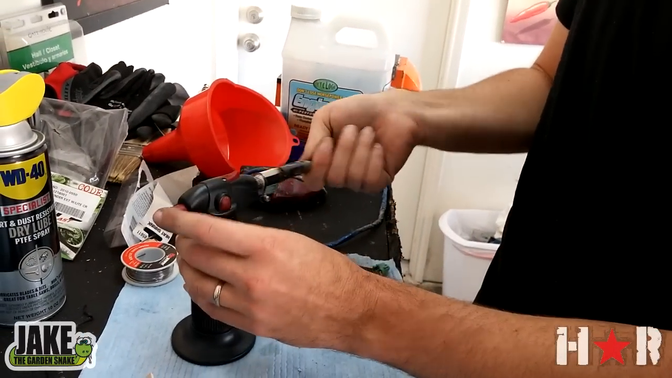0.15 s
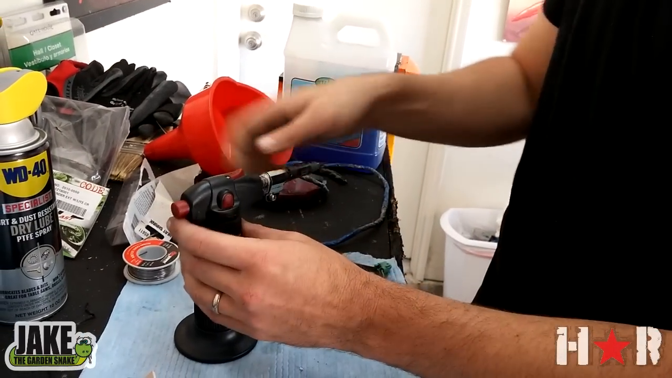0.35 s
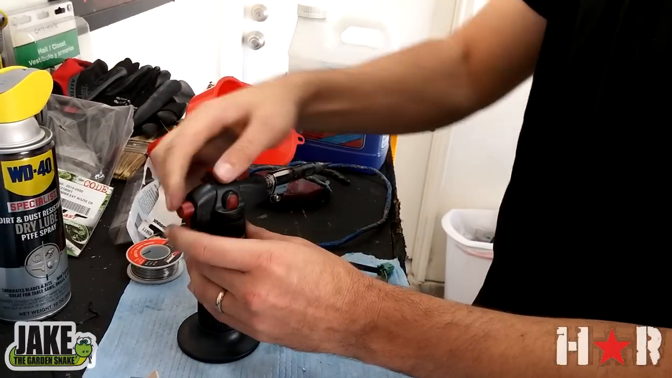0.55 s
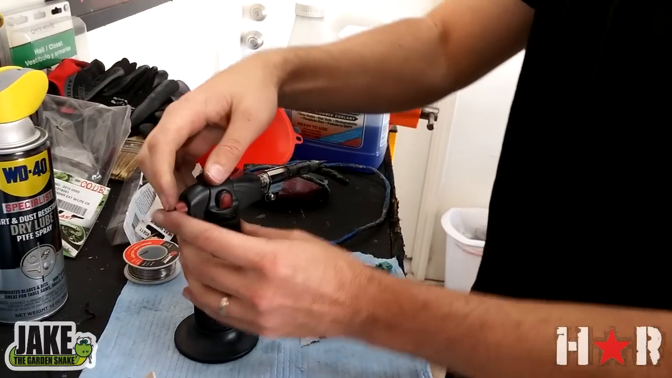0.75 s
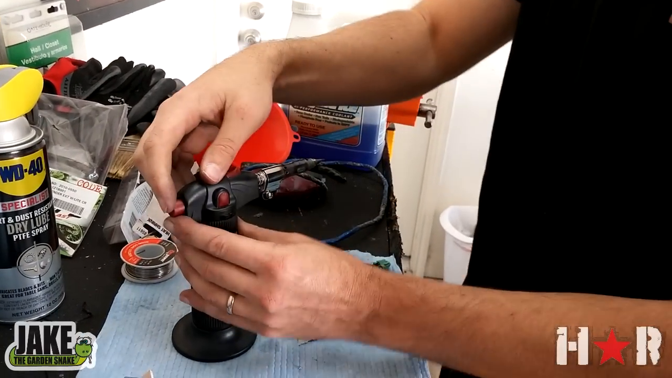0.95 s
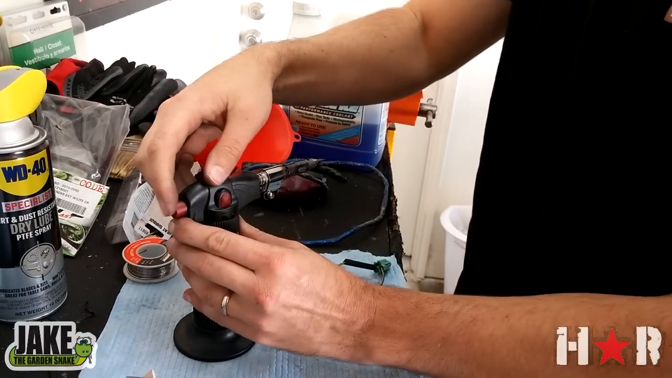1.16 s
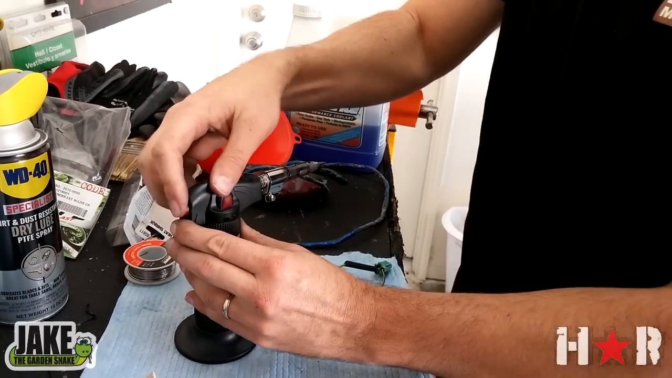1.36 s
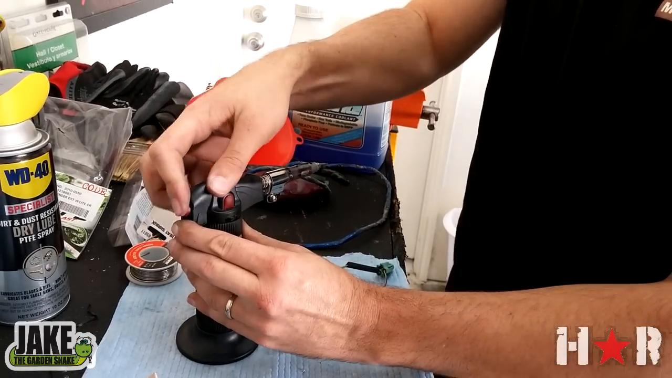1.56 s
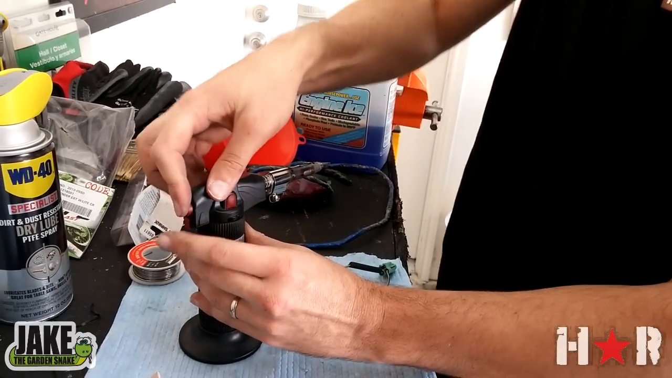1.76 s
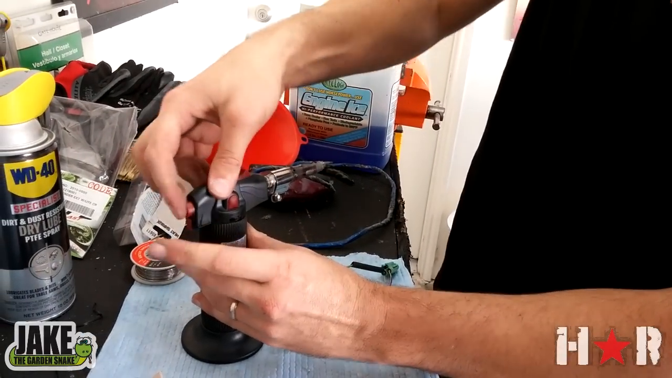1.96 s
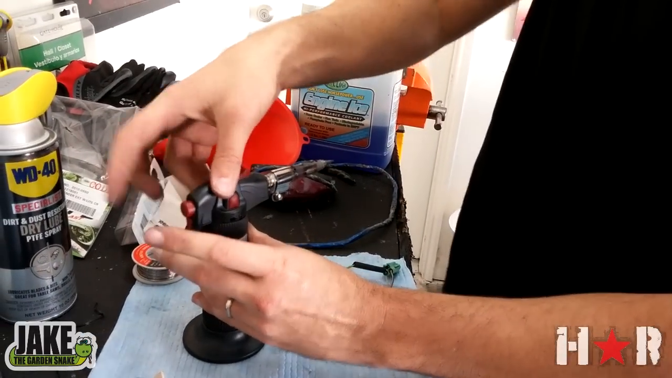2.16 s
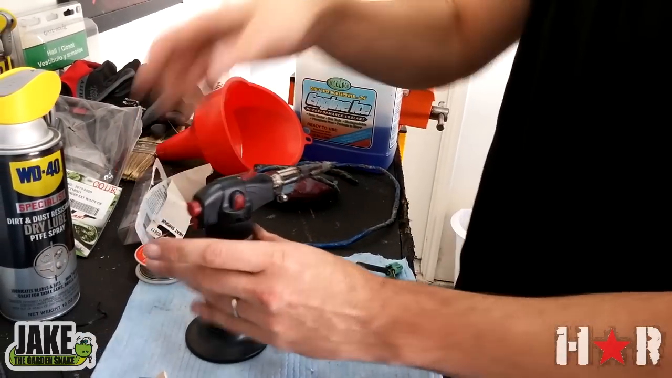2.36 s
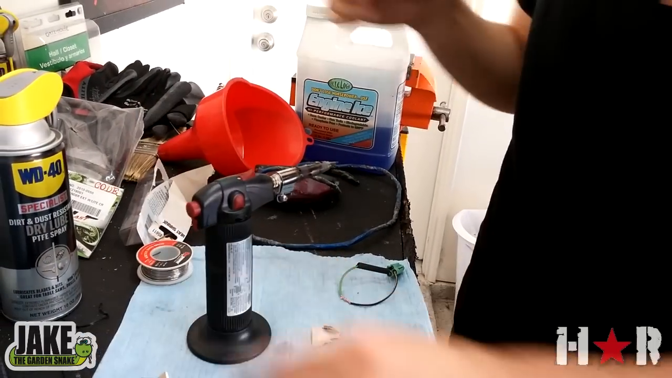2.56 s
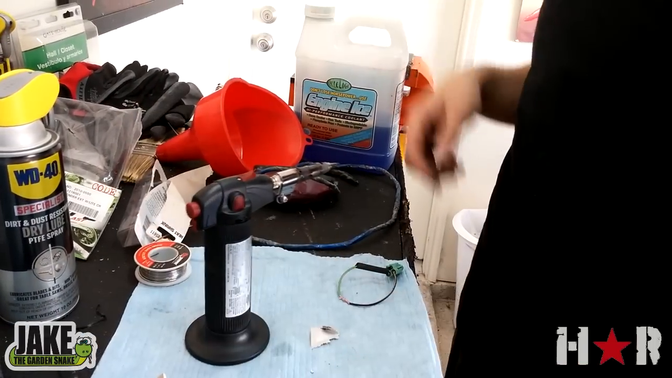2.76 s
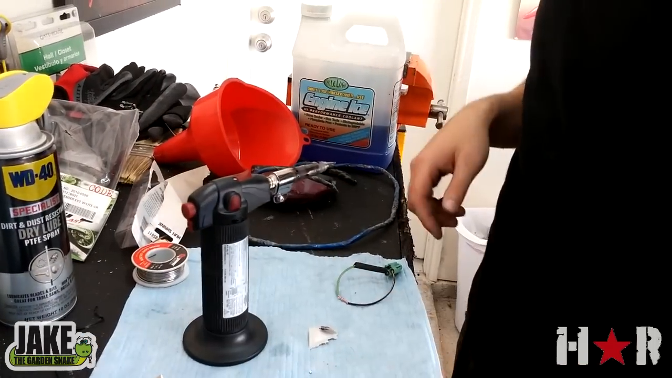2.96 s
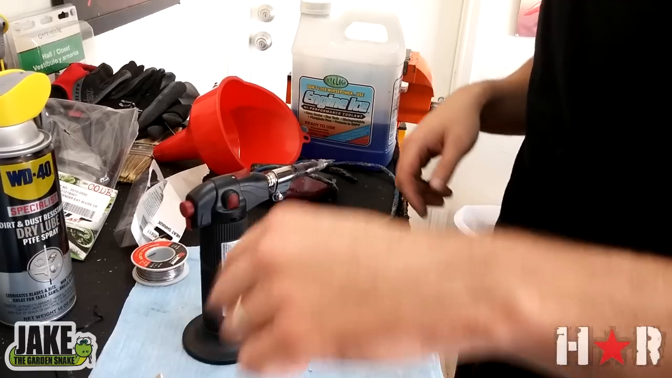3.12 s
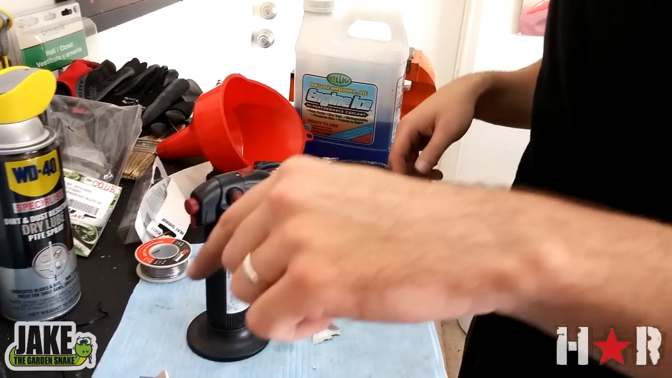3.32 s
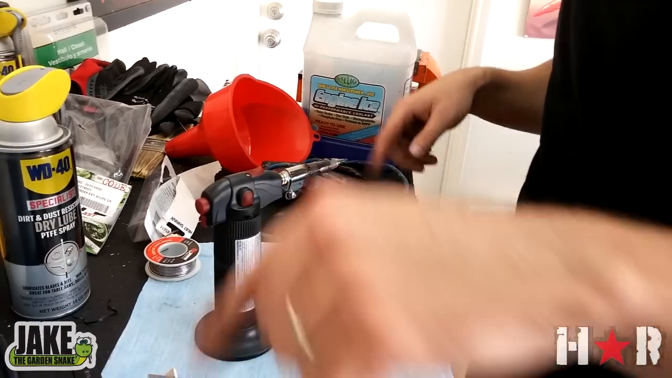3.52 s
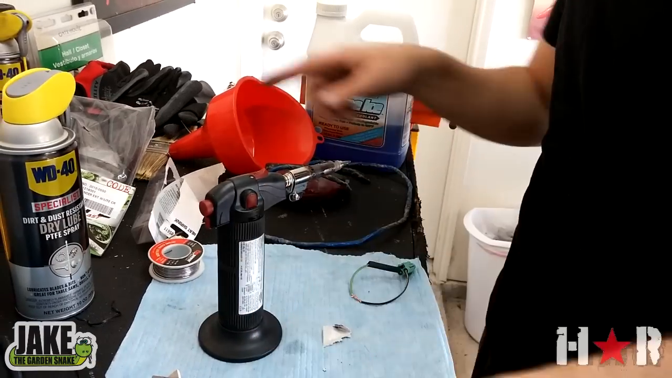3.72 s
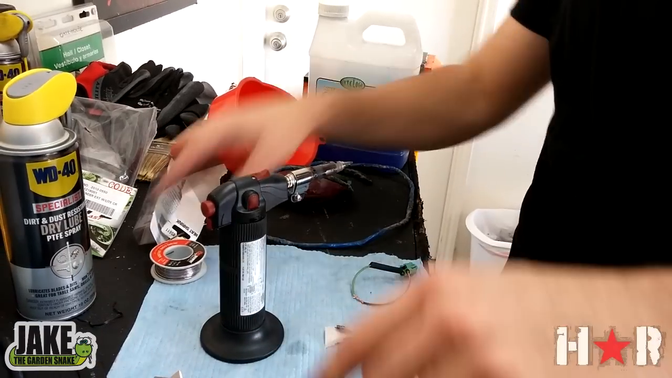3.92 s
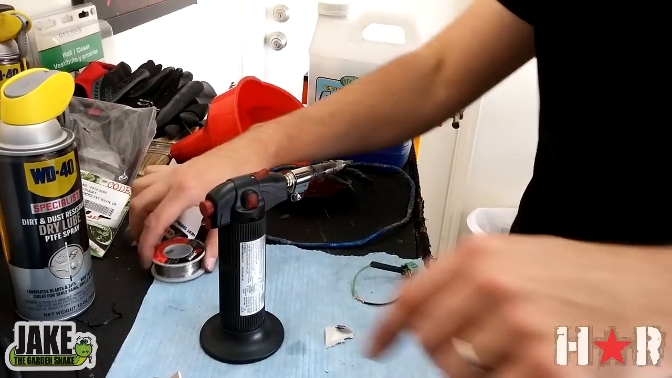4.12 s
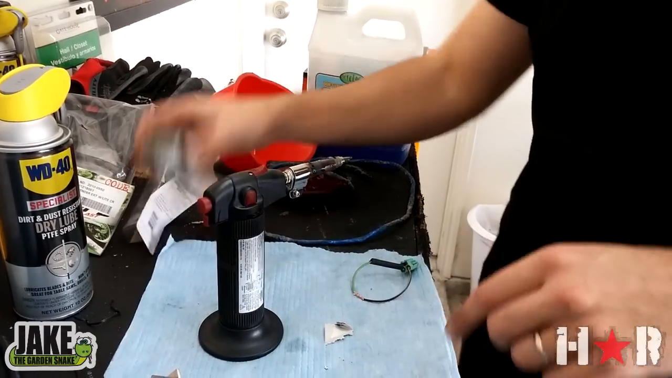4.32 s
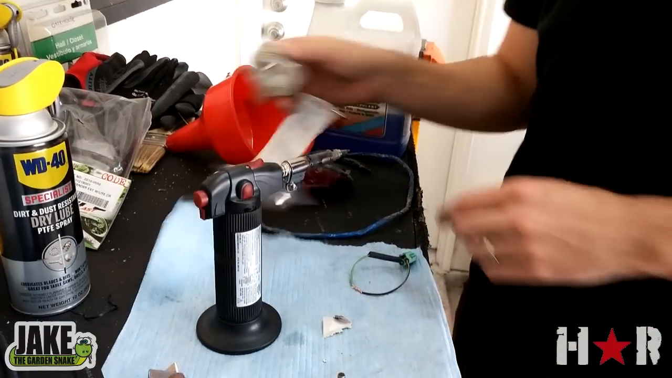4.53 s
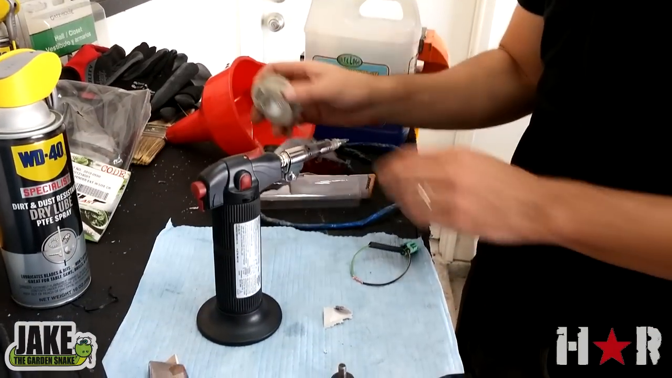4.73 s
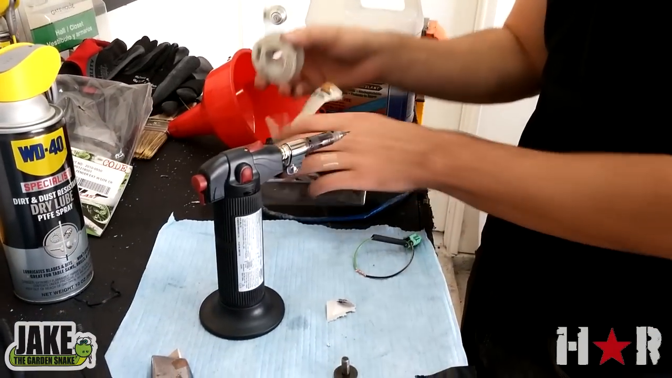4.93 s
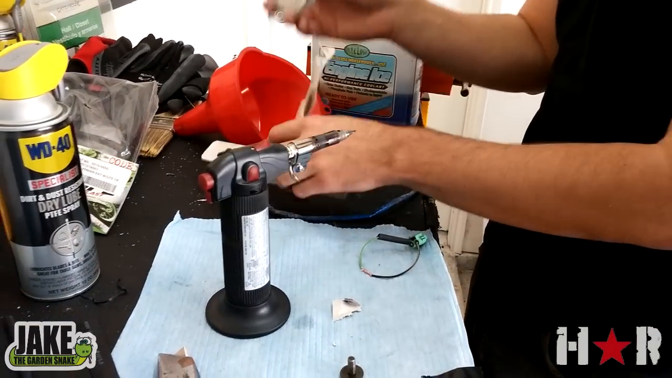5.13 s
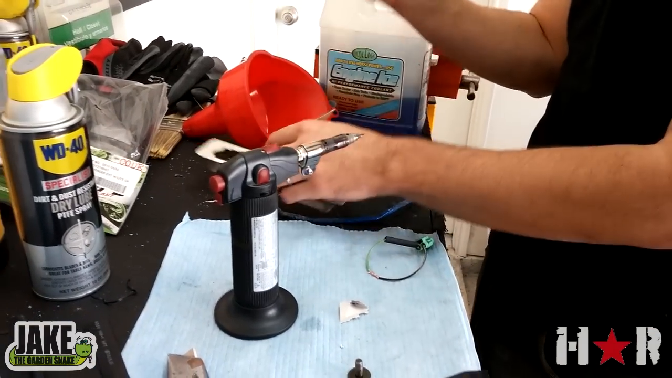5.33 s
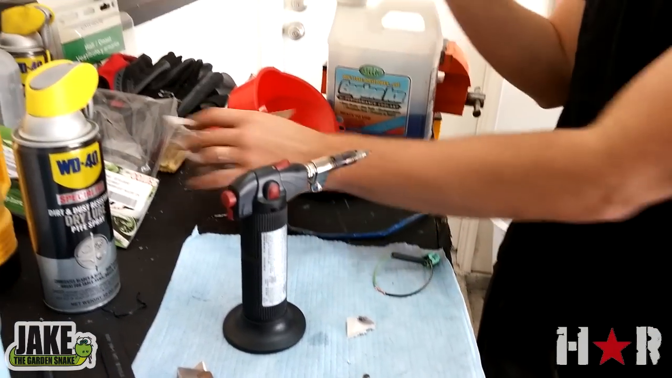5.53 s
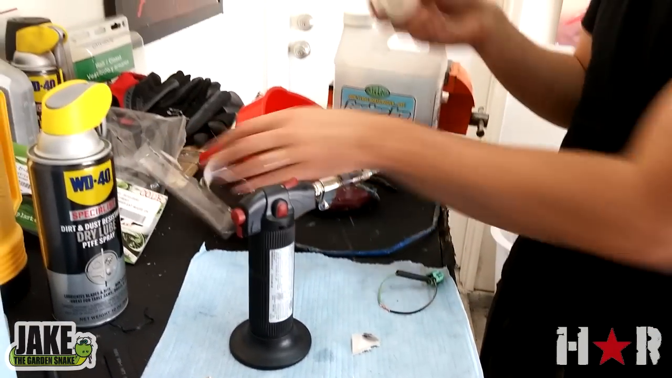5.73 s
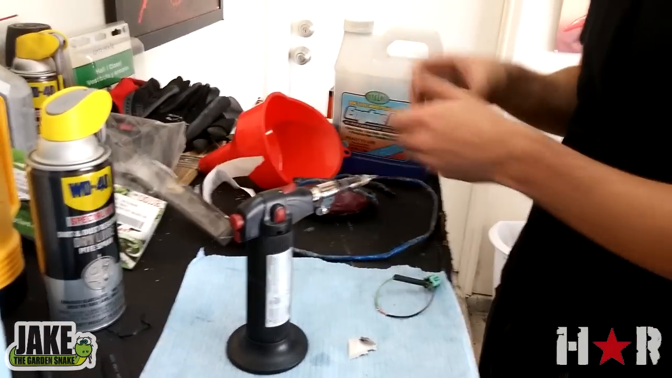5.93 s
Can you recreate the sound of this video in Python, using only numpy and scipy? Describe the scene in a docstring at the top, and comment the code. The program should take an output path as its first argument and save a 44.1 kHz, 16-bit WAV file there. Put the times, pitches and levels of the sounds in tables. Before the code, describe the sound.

A small butane torch lights with a sharp snap and hisses steadily, while a plastic box is picked up, knocked and set down.

```python
"""A butane torch on a workbench in a small room. Over a faint mains hum, fingers brush and handle the
torch with small clicks. The hum grows, cold gas leaks, and at 1.27 s the piezo lighter snaps and the gas
lights with a thump. The jet then hisses through the burner's resonances (the pitches it rings at) over
a soft flame roar, and a hollow note swells once. From 3.8 s a plastic box is picked up, rattled and put
down beside the torch, which burns on to the end."""
import sys
import numpy as np
from scipy import signal
from scipy.fft import rfft, irfft, next_fast_len
from scipy.io import wavfile
from scipy.ndimage import uniform_filter1d

SR = 44100
rng = np.random.default_rng(int(sys.argv[2]) if len(sys.argv) > 2 else 0)


def persist_wave(psi):
    """Save psi, clipped to +-1, as 16-bit WAV."""
    counts = np.round(np.clip(psi, -1, 1) * 32767).astype(np.int16)
    wavfile.write(sys.argv[1], SR, np.atleast_2d(counts).T)


N = 268172
TIME = np.arange(N) / SR
RING = TIME[:SR // 2]  # half a second of time, for short sounds


def undb(db):
    """Turn decibels into a number to multiply by."""
    return 10 ** (np.asarray(db) / 20)


def unit(x):
    """Scale a signal to an average strength (rms) of one."""
    return x / np.sqrt(np.mean(x ** 2))


def pan(db):
    """Left and right gains. A pan is the left level minus the right level, in dB."""
    return undb(np.array([[1], [-1]]) * db / 2)


def wander(rate):
    """A smooth random drift of about size one, with `rate` new values a second."""
    hold = int(SR / rate)
    steps = np.repeat(rng.standard_normal(N // hold + 1), hold)
    return unit(uniform_filter1d(uniform_filter1d(steps, hold), hold)[:N])


def ramp(middle_s, seconds):
    """An even change from 0 to 1."""
    return np.clip((TIME - middle_s) / seconds + .5, 0, 1)


def fade(t60):
    """Die away by 60 dB in t60 seconds, the ring time."""
    return np.exp(-np.log(1000) * RING / t60)


def envelope(s, length, attack, release):
    """Rise at time s, hold until the length is up, then die away."""
    return np.clip((TIME - s) / attack, 0, 1) * np.exp(-np.maximum(TIME - s - length, 0) / release)


def rubbing(rows, attack, release):
    """The strength of a series of rubs that all rise and fall the same way."""
    return sum(undb(db) * envelope(s, length, attack, release) for s, length, db in rows)


def colour(x, points, size=4096):
    """Shape the tone along a curve of (pitch [Hz], level [dB]) points."""
    hz, db = np.transpose(points)
    gain_db = np.interp(np.log(np.fft.rfftfreq(size, 1 / SR) + 1), np.log(hz), db)
    cepstrum = irfft(np.log(undb(gain_db)))
    cepstrum[1:size // 2] *= 2  # folded so that nothing rings before the sound starts
    cepstrum[size // 2 + 1:] = 0
    response = irfft(np.exp(rfft(cepstrum)))
    return signal.fftconvolve(np.atleast_2d(x), response[None], axes=1)[:, :x.shape[-1]]


def lowpass(x, hz, order=2):
    """Cut the treble above hz."""
    return signal.sosfilt(signal.butter(order, min(hz, SR / 2 - 1000), fs=SR, output="sos"), x)


def highpass(x, hz):
    """Gently cut the bass below hz."""
    return signal.sosfilt(signal.butter(1, min(hz, SR / 4), "high", fs=SR, output="sos"), x)


def aside(x, db, shadow_hz=700):
    """Move a sound to one side: only the treble is shadowed, the bass reaches both sides alike."""
    bass = lowpass(x, shadow_hz, order=1)
    return bass + (x - bass) * pan(db)


def diffuse(count, split_hz=1300):
    """Noise from all around: left and right are alike in the bass, unrelated in the treble."""
    mid, side = rfft(rng.standard_normal((2, count)))
    likeness = np.exp(-(np.fft.rfftfreq(count, 1 / SR) / split_hz) ** 2)
    spectrum = mid * np.sqrt(1 + likeness) + np.array([[1], [-1]]) * side * np.sqrt(1 - likeness)
    return irfft(spectrum, count) / np.sqrt(2)


def room(x, wet_db, t60=0.47, treble_t60=0.34):
    """Add the echoes of a small cluttered room, whose treble dies first."""
    noise = diffuse(len(RING))
    low = lowpass(noise, 3500)
    onset = np.clip(RING / 0.0019 - 1, 0, 1)
    tail = (low * fade(t60) + (noise - low) * fade(treble_t60)) * onset
    return x + undb(wet_db) * signal.fftconvolve(x, unit(tail) / np.sqrt(len(RING)), axes=1)[:, :N]


def add(out, s, db, sound, size=176):
    """Mix in a short sound at time s, with its loudest 4 ms at level db."""
    start = max(int(s * SR), 0)
    peak = np.sqrt(uniform_filter1d(np.mean(sound ** 2, axis=0), size).max())
    out[:, start:start + len(RING)] += (sound * undb(db) / peak)[:, :N - start]


def contact(seconds, spread):
    """A burst of tiny impacts as two hard parts meet; nearby things scatter it left and right."""
    burst = rng.standard_normal(len(RING)) + spread * diffuse(len(RING))
    return burst * np.exp(-RING / seconds) * (1 - np.exp(-RING / 0.00068))


def resonance(hz, width, db=0, pan_db=0, lead=0, likeness=0.77, waver_db=1.45):
    """Noise ringing around one pitch and wavering; the right side's wave is `lead` radians ahead."""
    size = next_fast_len(N)
    freqs = np.fft.rfftfreq(size, 1 / SR)
    direct, *scattered = rfft(rng.standard_normal((3, size)))
    phase = np.exp(np.array([[-.5j], [.5j]]) * lead)
    sides = np.sqrt(likeness) * direct * phase + np.sqrt(1 - likeness) * np.array(scattered)
    band = irfft(sides / (1 + ((freqs - hz) / (0.89 * width)) ** 2), size)[:, :N]
    waver = waver_db * np.array([wander(3.11), wander(3.36)])
    return band * undb(db + waver) * pan(pan_db)


# tone of the room's rumble (pitch [Hz], level [dB])
RUMBLE_TONE = [(20, -41), (38, -33), (60, 12.5), (78, 5), (100, 0), (170, -1.5), (260, -6.5), (600, -10),
               (1200, -19.5), (4000, -29)]
def background(quiet_db=-70, rise_db=18, sag_db_per_s=.5):
    """An appliance hums at twice the mains frequency over a rumble; both swell as the torch lights."""
    hum = np.sqrt(2) * np.sin(2 * np.pi * 119.9 * TIME) * undb(.7 * wander(8))
    rumble = unit(colour(diffuse(N), RUMBLE_TONE))
    db = quiet_db + rise_db * ramp(middle_s=1.057, seconds=0.58) - sag_db_per_s * TIME
    return (hum + rumble) * undb(db) * pan(2.3)


# tone of skin brushing the torch (pitch [Hz], level [dB])
BRUSH_TONE = [(300, -2), (1200, -14), (2050, -4), (3400, -12), (4700, -9.5), (8000, -17.5), (15000, -23)]
# finger strokes (time [s], length [s], level [dB])
STROKES = [(0, .03, -70), (.24, 0.028, -73.5), (1.06, .2, -81)]
# fingertip drags that ring one note of the housing (time [s], length [s], level [dB])
DRAGS = [(.25, 0.065, -71), (1.06, 0.027, -63)]
# tone of a click (pitch [Hz], level [dB])
CLICK_TONE = [(200, -55), (900, -18), (1250, -4), (1440, -2), (1700, -1), (2200, 4.5), (3100, -8),
              (4800, 6), (7000, -6.5), (15000, -2)]
# small handling clicks and ticks (time [s], level [dB], treble cut [Hz], pan [dB], bass cut [Hz])
CLICKS = [(.02, -57, 12100, -2, 400), (.251, -60, 4000, 10, 800), (.272, -76, 7000, 3, 2000),
          (.302, -66, 4500, 4, 1500), (.874, -41, 5940, 0.5, 300), (1.065, -53.5, 1850, 2, 400),
          (1.077, -59, 1700, 12, 400), (1.177, -59, 3220, 6, 990), (1.464, -27.5, 2850, 7, 3000)]
def fingers(ring_hz=1440, ring_t60=0.11, ring_db=-13.5):
    """Fingers handle the torch: skin brushes the housing, and small clicks and ticks ring its plastic."""
    brush = unit(colour(diffuse(N), BRUSH_TONE)) * undb(2.0 * wander(31))
    drag = unit(resonance(hz=1980, width=170, pan_db=11))
    out = brush * rubbing(STROKES, attack=0.0092, release=0.32)
    out += drag * rubbing(DRAGS, attack=0.0065, release=.04)
    ring = unit(np.sin(2 * np.pi * ring_hz * RING) * fade(ring_t60)) * undb(ring_db)
    for s, db, treble_hz, pan_db, bass_hz in CLICKS:
        impact = colour(contact(0.0032, spread=0.92), CLICK_TONE)
        click = unit(lowpass(impact, treble_hz)) + ring
        add(out, s, db, highpass(click, bass_hz) * pan(pan_db))
    return room(out, wet_db=-4.0)


VALVE_S, SPARK_S, FLASH_S = 1.143, 1.2677, 1.2732  # the gas starts, the spark snaps, the gas lights

# resonances of the cold gas (pitch [Hz], width [Hz], relative level [dB], pan [dB], right lead [rad])
COLD_GAS = [(2100, 680, -13.5, 15, .5), (4340, 360, 2.5, -6, 0.43), (5800, 380, -2.5, -2, 1.8)]
def leak(level_db=-52):
    """Unlit gas rushes from the nozzle, from the moment the valve opens until it lights."""
    flow = envelope(VALVE_S, FLASH_S - VALVE_S, attack=0.047, release=.003)
    return unit(sum(resonance(*row) for row in COLD_GAS)) * undb(level_db) * flow


# tone of the piezo's snap (pitch [Hz], level [dB])
PIEZO_TONE = [(300, -29), (650, -22), (900, -5), (1150, -7.5), (1600, -11.5), (2200, -5), (2950, 3),
              (4000, -4.5), (4600, 2), (6000, -3.5), (7200, -10), (9000, -3.5), (12500, -10), (16000, -9.5)]
# how the snap leans to one side (pitch [Hz], pan [dB])
SPARK_PAN = [(1000, 7), (4000, 6.5), (8500, -11), (10500, 3), (13000, 6.5)]
def spark():
    """The lighter's little hammer snaps onto its piezo crystal."""
    out = np.zeros((2, N))
    add(out, SPARK_S, db=-9.5, sound=colour(contact(0.0038, spread=2.2), PIEZO_TONE))
    left, right = room(out, wet_db=-6.5, treble_t60=0.28)
    return np.vstack([colour(left, [(hz, db / 2) for hz, db in SPARK_PAN]),
                      colour(right, [(hz, -db / 2) for hz, db in SPARK_PAN])])


# tone of the thump as the gas lights (pitch [Hz], level [dB])
THUMP_TONE = [(25, -47), (60, 4.5), (110, -9), (165, -1), (215, -6), (320, -4), (420, -7), (620, -40),
              (900, -25.5), (1200, -37), (1700, -29), (4000, -76)]
def flash(swing_s=0.0025, bench_s=0.0062, bench_db=-2, wall_s=0.04, wall_db=-13, boom_hz=292):
    """The leaked gas burns at once: one pressure swing, echoes off bench and wall, and a short boom."""
    out = np.zeros((2, N))
    push = np.zeros((1, len(RING)))
    for s, size in [(0, -1), (swing_s, 1), (bench_s, -undb(bench_db)), (wall_s, undb(wall_db))]:
        push[0, int(s * SR)] += size
    add(out, FLASH_S, db=-12, sound=colour(push, THUMP_TONE) * pan(0.99))
    boom = np.sin(2 * np.pi * boom_hz * RING) * fade(0.085) * (1 - np.exp(-RING / 0.005))
    add(out, FLASH_S + .026, db=-27, sound=boom * pan(0))  # a low note of the room answers
    return room(out, wet_db=-11.5, t60=0.37)


# tone of the thin, airy top of the hiss (pitch [Hz], level [dB])
AIR_TONE = [(1000, -7), (3500, -11), (6800, 8.5), (7600, 2), (8200, -8), (9300, -0.5), (12000, -44),
            (15500, 0.5)]
# the flame's levels as arms move around it
# (time [s], roar [dB], lowest hiss [dB], lower hiss [dB], middle hiss [dB], upper hiss [dB])
FLAME_LEVELS = [(1.45, -52.5, -52.5, -42, -37.5, -43.5), (2.2, -53, -53.5, -42.5, -37, -42.5),
                (2.4, -54.5, -53, -38, -38, -42), (2.72, -54, -55.5, -38.5, -37.5, -41),
                (2.86, -58, -63, -41.5, -39, -43.5), (3.02, -53.5, -55, -39.5, -41, -45),
                (3.22, -52, -54.5, -41, -38.5, -43), (3.4, -54, -57, -42, -40, -44),
                (3.55, -51, -53, -41.5, -39, -43), (3.85, -49.5, -49.5, -39.5, -38.5, -44),
                (4.85, -48, -49, -37.5, -37.5, -44), (4.97, -54, -53, -40, -38.5, -46.5),
                (5.24, -54.5, -51.5, -40, -38.5, -45), (5.6, -48.5, -50, -37, -38, -43.5),
                (6.05, -55.5, -51.5, -40.5, -38.5, -47.5)]
def flame(air_db=-60, air_rise_db=7.0):
    """The lit torch: a hissing jet, a thin airy top and a low roar."""
    nudge = ramp(middle_s=4.05, seconds=0.23)  # the nozzle points a little elsewhere afterwards
    times, *columns = np.transpose(FLAME_LEVELS)
    roar_db, *hiss_dbs = [np.interp(TIME, times, column) for column in columns]
    hiss = jet(hiss_dbs, nudge)
    air = unit(colour(diffuse(N), AIR_TONE)) * undb(air_db + nudge * air_rise_db) * pan(-4)
    lit = np.clip((TIME - FLASH_S) / 0.0075, 0, 1)
    return room((hiss + air + roar(roar_db)) * lit, wet_db=-6.5)


# resonances of the burner (pitch [Hz], width [Hz], relative level [dB], pan [dB], right lead [rad],
# relative level after the nudge [dB], pan after the nudge [dB])
BURNER = [(894, 81, -9.5, 7.5, 1, -8, -6), (1230, 66, -13.5, 11, 1, -22, 5),
          (1501, 71, -5, -2, 0, -4.5, -3), (1680, 83, -8.5, 1, 4, -2.5, 8),
          (2050, 193, -0.5, 15, 1, -1.5, 8.5), (2465, 194, 1, 8, 0.2, 1, 8.5),
          (2694, 250, -2, 7.5, 0, -1, 8), (3055, 310, 1, 1, -0.2, -0.5, 5),
          (3840, 540, -2, -2, 2.5, -3.5, -6.5), (4230, 210, 3, 2, -1.3, -2.5, 7),
          (4630, 240, 3, 4, 0.5, 5.5, -4), (4935, 190, 1.5, 1, 1.5, -0.5, 5), (5275, 230, 0, 5, 2, 2.5, 6),
          (5890, 460, 6, 2, 2, -0.5, 12.5), (6530, 560, -1, -7, -1.7, 3, -4.5)]
def jet(hiss_dbs, nudge, trim_db=-0.54, flutter_db=0.5):
    """Swirling gas rings the burner's resonances, which rise and fall in four groups."""
    flutter = undb(flutter_db * wander(25.01))
    bands = [resonance(hz, width, db + nudge * (db_after - db), side + nudge * (side_after - side), lead)
             for hz, width, db, side, lead, db_after, side_after in BURNER]
    groups = bands[:4], bands[4:8], bands[8:13], bands[13:]
    hiss = sum(arm_echoes(sum(group)) * undb(db + trim_db) for group, db in zip(groups, hiss_dbs))
    return lowpass(hiss + swells(), 7170, order=12) * flutter


def arm_echoes(x, lags_s=(.0012, .0034), sway_s=.00016, echo_db=-9):
    """Echoes off moving arms come and go and shift in delay, sliding ripples through the hiss."""
    def echo(side, lag):
        return np.interp(TIME - lag - sway_s * wander(1.7), TIME, side) * wander(2.486)
    echoes = np.array([sum(echo(side, lag) for lag in lags_s) for side in x])
    return unit(x + undb(echo_db) * echoes)


# tone of the flame's roar (pitch [Hz], level [dB])
ROAR_TONE = [(120, -16.5), (180, -7), (260, -4.5), (350, 1.5), (480, -4), (680, -16), (1200, -15.5),
             (2000, -29.5)]
def roar(level_db, flare_db=14, flutter_db=0.8, note_db=-8.5, note_flutter_db=3):
    """Burning gas roars with a loose, fluttering note in it; it flares as it lights, then settles."""
    flare = flare_db * envelope(FLASH_S, length=0, attack=.001, release=0.14)
    note = unit(resonance(hz=345, width=29, likeness=1.0)) * undb(note_db + note_flutter_db * wander(16))
    burning = unit(colour(diffuse(N), ROAR_TONE))
    return (burning + note) * undb(level_db + flare + flutter_db * wander(14))


# resonances that stand out as the arms move
# (time [s], length [s], pitch [Hz], width [Hz], level [dB], pan [dB])
SWELLS = [(1.324, 0.79, 4420, 260, -42, 4), (1.318, .9, 5760, 200, -49.5, -5),
          (2.38, 0.29, 5330, 220, -51, 0), (2.62, 0.21, 4800, 300, -43, 10),
          (2.66, 0.19, 4280, 250, -49, -2), (3.077, 0.79, 2520, 130, -50.5, 4),
          (3.403, 0.36, 3000, 180, -45.5, 0), (3.4, 0.16, 4200, 300, -44.5, -1),
          (3.4, .3, 4540, 200, -43.5, -2), (4.582, 1.5, 4620, 250, -47, -14),
          (4.75, 1.22, 507, 111, -55, -1.5), (5.553, 0.25, 2170, 140, -47.5, 12)]
def swells(attack_s=0.062, release_s=0.087):
    """One resonance of the hiss after another comes forward, holds and sinks back."""
    return sum(unit(resonance(hz, width, pan_db=pan_db)) * undb(db)
               * envelope(s, length, attack_s, release_s)
               for s, length, hz, width, db, pan_db in SWELLS)


def hollow(level_db=-46.5):
    """A soft hollow note swells briefly under the hiss."""
    note = unit(resonance(hz=252, width=14, likeness=0.92))
    return note * undb(level_db) * envelope(s=3.37, length=0.12, attack=0.022, release=.03)


def box():
    """The plastic box is dragged, knocked about and put down; something loose rattles in it."""
    return room(bumps() + scrape() + knocks() + rattles() + ticks(), wet_db=-7.5)


# soft bumps (time [s], level [dB], pitch [Hz], ring time [s])
BUMPS = [(3.831, -31.5, 125, 0.057), (3.872, -41, 290, 0.18), (4.286, -32.5, 430, .07),
         (4.418, -30, 175, 0.1), (4.42, -30, 340, 0.11), (4.84, -35, 430, 0.076), (5.035, -36, 1700, 0.077),
         (5.426, -32, 218, 0.11), (5.428, -34, 830, 0.076)]
def bumps():
    """Each soft bump rings one note of the bench top or the box."""
    out = np.zeros((2, N))
    for s, db, hz, t60 in BUMPS:
        add(out, s, db, np.sin(2 * np.pi * hz * RING) * fade(t60) * pan(0))
    return out


# tone of a dull contact, also used for knocks and rattles (pitch [Hz], level [dB])
DULL_TONE = [(30, -44), (90, -9), (200, -1), (380, 6), (640, -1.5), (930, 1), (1270, -1.5), (1700, 2.5),
             (2700, 4.5), (4000, 1), (6000, -14), (15000, -31)]
# slides of the box (time [s], length [s], level [dB])
SLIDES = [(3.835, 0.097, -42.5), (4.2, 0.021, -36.5), (4.245, 0.061, -32.5), (4.44, 0.082, -38.5),
          (4.8, 0.072, -42)]
def scrape(ring_db=-5, edge_hz=1000, edge_db=-5.5, rasp_hz=2900, crinkle_db=-27):
    """The box's edge sticks and slips on the bench, ringing the shell and its own note; it crinkles."""
    slips = diffuse(N) * undb(5.0 * wander(150))
    ring = unit(signal.fftconvolve(slips, shell(edge_hz), axes=1)[:, :N])
    edge = unit(resonance(edge_hz, width=140, pan_db=1.8))
    rubbed = unit(colour(slips, DULL_TONE)) + undb(ring_db) * ring + undb(edge_db) * edge
    rasp = unit(highpass(lowpass(rubbed, rasp_hz, order=3), 440))
    crinkle = undb(crinkle_db) * unit(highpass(slips, 6000))
    return (rasp + crinkle) * rubbing(SLIDES, attack=0.0055, release=0.027)


# the notes the box rings at (pitch [Hz], relative level [dB], ring time [s])
BOX_NOTES = [(340, -5, 0.098), (476, -7, 0.052), (535, -11, 0.125), (858, -11.5, 0.063), (973, -5.5, 0.049),
             (1149, -9, 0.083), (1423, -20, 0.17), (1556, 0.5, 0.082), (1681, -2, 0.074), (1733, 3, 0.044),
             (1877, -2, 0.073), (2450, -11, 0.049), (2773, -4.5, .07), (3006, -1, 0.089)]
def shell(spot_hz, spot_db=11.5, spot_octaves=0.16, scatter_db=1.5, size=8192):
    """The box's shell rings; the spot that is struck favours the notes near spot_hz."""
    hz, db, t60 = np.transpose(BOX_NOTES)[:, :, None]
    strength, skew = rng.standard_normal((2, len(BOX_NOTES), 1))
    lag = np.array([1, -1])[:, None, None] * skew * .00005  # high notes reach the two sides out of step
    favour = spot_db * np.exp(-(np.log2(hz / spot_hz) / spot_octaves) ** 2)
    notes = undb(db + favour + scatter_db * strength) * np.sin(2 * np.pi * hz * (RING + lag)) * fade(t60)
    return notes.sum(axis=1)[:, :size]


# knocks on the box
# (time [s], relative level [dB], pan [dB], contact time [s], favoured pitch [Hz], bass cut [Hz])
KNOCKS = [(3.8378, -30, 3, 0.0084, 1520, 150), (3.847, -30, 3, 0.0067, 900, 120),
          (3.853, -26.5, 13, 0.0022, 2400, 300), (3.899, -32.5, 4, 0.0068, 1590, 150),
          (4.219, -34, 12, 0.0075, 1000, 484), (4.225, -24, 6, 0.0024, 2200, 600),
          (4.2424, -21, 7, 0.0052, 1610, 480), (4.249, -27, 6, .004, 2000, 600),
          (4.259, -25, 2, .003, 3000, 600), (4.288, -29, -3, 0.0057, 860, 250),
          (4.365, -26.5, 2, 0.0034, 1410, 480), (4.377, -24.5, 3, .004, 1100, 300),
          (4.3927, -14.5, 6, 0.0067, 1860, 400), (4.4156, -2, 6, 0.0032, 1800, 403),
          (4.423, -14.5, 4, 0.0036, 860, 200), (4.467, -27, -1, 0.0037, 400, 200),
          (4.6193, -24.5, 7, 0.015, 1400, 700), (4.807, -29.5, 1, 0.0033, 1170, 250),
          (4.826, -33, 7, 0.0032, 1560, 300), (4.866, -35, 7, 0.006, 1760, 251),
          (4.876, -35, 1, .004, 980, 400), (5.4235, -14.5, 4, 0.0049, 2830, 170),
          (5.4305, -17.5, 7, 0.012, 475, 130), (5.471, -24.5, 3, 0.0099, 400, 200)]
def knocks(trim_db=-2.5, ring_db=-3, grip_t60=0.22, snap_db=-16):
    """Each blow thuds and rings the shell, which the hand damps; hard blows snap at the edge."""
    out = np.zeros((2, N))
    for s, db, pan_db, seconds, spot_hz, bass_hz in KNOCKS:
        thud = unit(colour(contact(seconds, spread=1.9), DULL_TONE))
        ring = shell(spot_hz, size=len(RING)) * (1 - np.exp(-RING / 0.0012)) * fade(grip_t60)
        treble_hz = 2450 * (0.0053 / seconds) ** 0.23  # longer contacts are duller
        treble_hz *= 2 ** (0.0079 * (db + 13.0))  # harder blows are brighter
        blow = lowpass(thud + unit(ring) * undb(ring_db), treble_hz, order=3)
        blow += edge_snap() * undb(snap_db + 1.4 * db)
        add(out, s, db + trim_db, aside(highpass(blow, bass_hz), pan_db))
    return out


# tone of a hard edge's snap (pitch [Hz], level [dB])
SNAP_TONE = [(1000, -12), (3000, 6), (5000, -8), (7500, -3), (8600, 10), (9600, -6), (11500, -4),
             (15000, -11)]
def edge_snap():
    """A hard edge makes a very short, bright contact."""
    return unit(colour(contact(0.0027, spread=2.1), SNAP_TONE)) * pan(1.4)


# light taps inside the box, and the box's quick second bounce just after the hardest knock (time [s], level
# [dB], pitch [Hz])
RATTLES = [(4.2186, -28.5, 994), (4.2416, -26, 975), (4.248, -24, 956), (4.2584, -28, 950),
           (4.273, -32, 1090), (4.2827, -25.5, 1410), (4.4226, -13.5, 1767), (4.464, -26, 1180),
           (4.484, -28, 1550), (4.491, -24.5, 1610), (4.516, -25, 1770), (4.523, -25.5, 1460),
           (4.5303, -25.5, 1700)]
def rattles(t60=0.018, rise_s=0.001, thud_db=-9):
    """Short taps, each one quickly damped note over a small thud: mostly a loose part tapping inside the box,
    and once the box bouncing again just after its hardest knock."""
    out = np.zeros((2, N))
    for s, db, hz in RATTLES:
        note = np.sin(2 * np.pi * hz * RING) * fade(t60) * (1 - np.exp(-RING / rise_s))
        thud = lowpass(colour(contact(0.0042, spread=0.82), DULL_TONE), 2450)
        add(out, s, db, aside(unit(note) + undb(thud_db) * unit(thud), db=7.0))
    return out


# tone of a tick (pitch [Hz], level [dB])
TICK_TONE = [(3000, -18), (6000, -5), (8500, 4), (11500, -4), (15500, 0)]
# ticks of the plastic (time [s], level [dB], pan [dB])
TICKS = [(4.262, -51, 3), (4.293, -54, 3), (4.808, -54, 2), (4.893, -50, 2), (5.029, -47, 2),
         (5.868, -56, 2)]
def ticks():
    """Thin plastic ticks crisply as it flexes in the hand."""
    out = np.zeros((2, N))
    for s, db, pan_db in TICKS:
        add(out, s, db, colour(contact(0.0089, spread=1.8), TICK_TONE) * pan(pan_db))
    return out


def scene():
    """Everything on and around the bench, with the hum underneath."""
    return fingers() + leak() + spark() + flash() + flame() + hollow() + box() + background()


def record(dry, top_hz=16000):
    """Round off the loudest peaks and cut the highest treble."""
    return signal.sosfilt(signal.ellip(10, .2, 70, top_hz, fs=SR, output="sos"), np.tanh(dry))


dry = scene()
out = record(dry)
persist_wave(out)
```